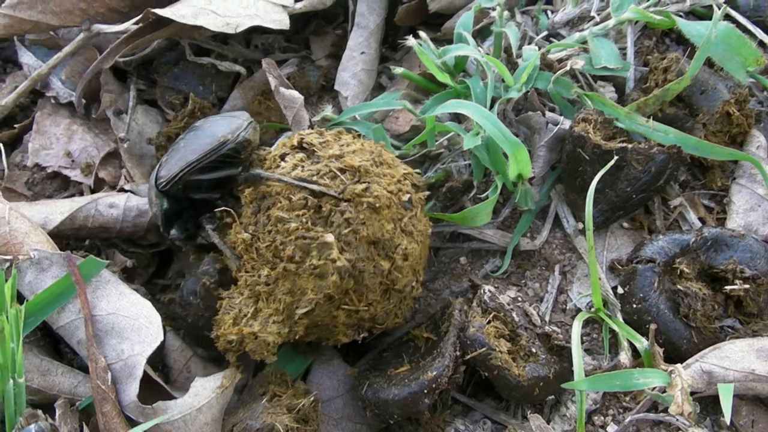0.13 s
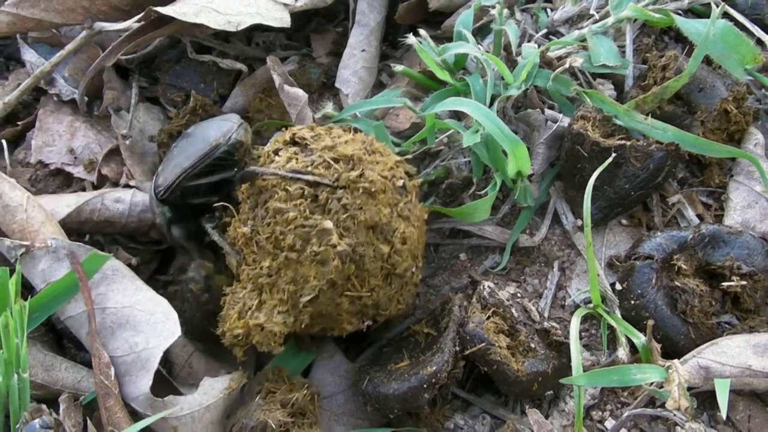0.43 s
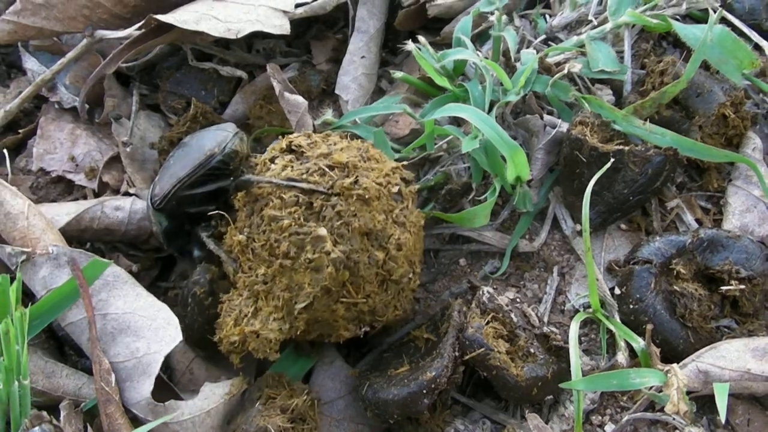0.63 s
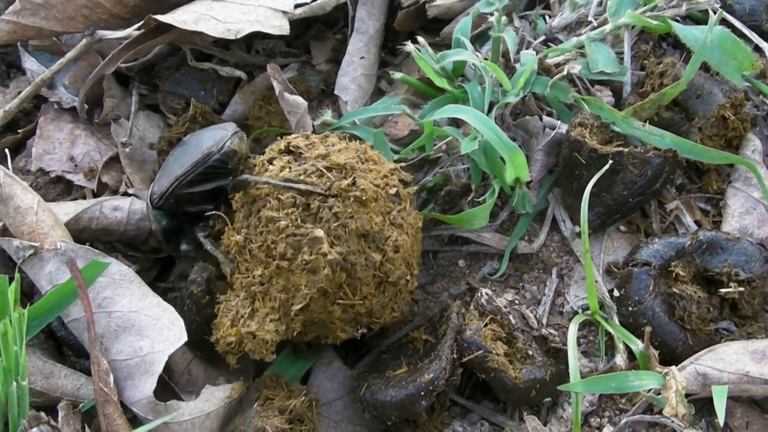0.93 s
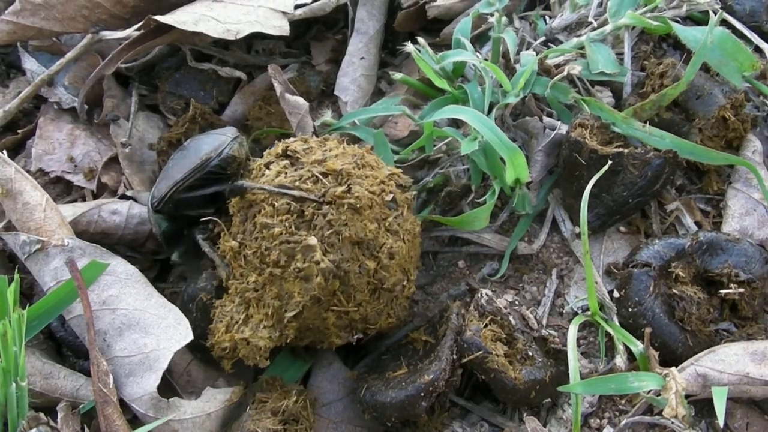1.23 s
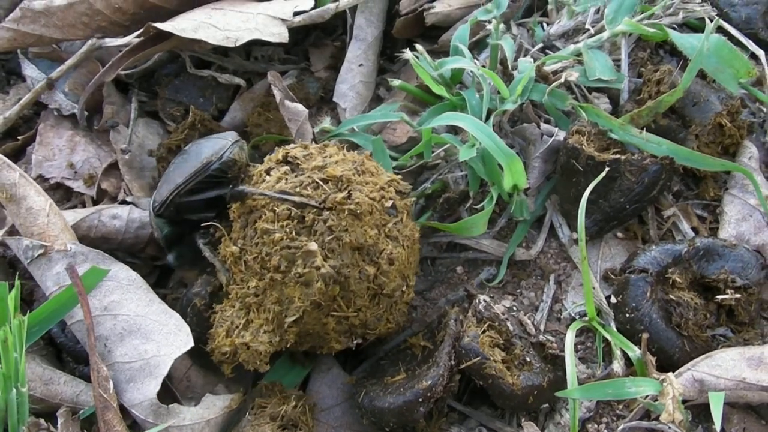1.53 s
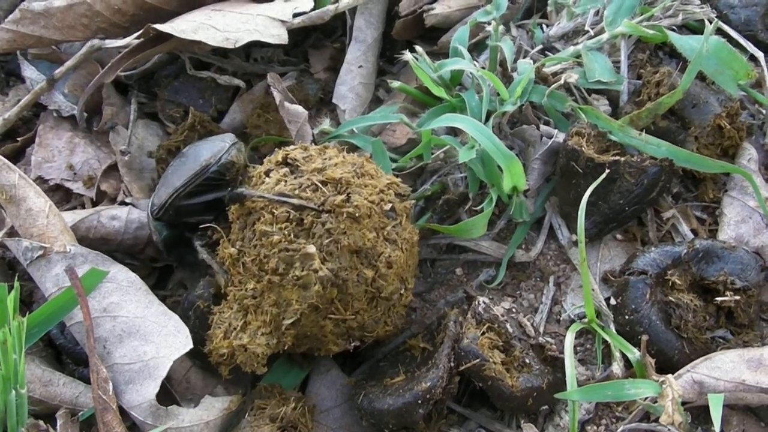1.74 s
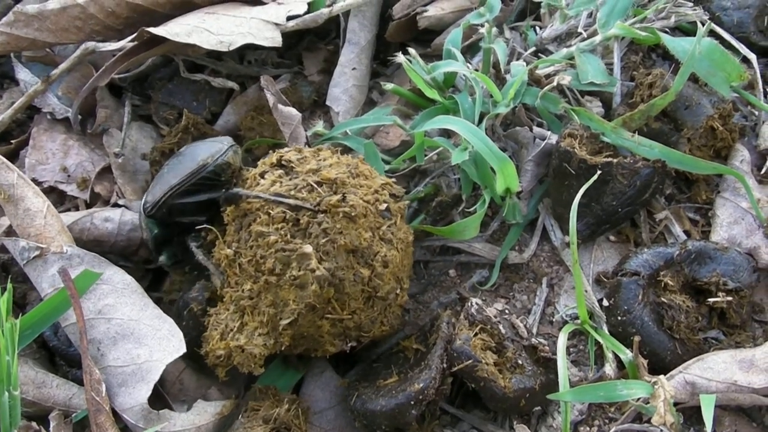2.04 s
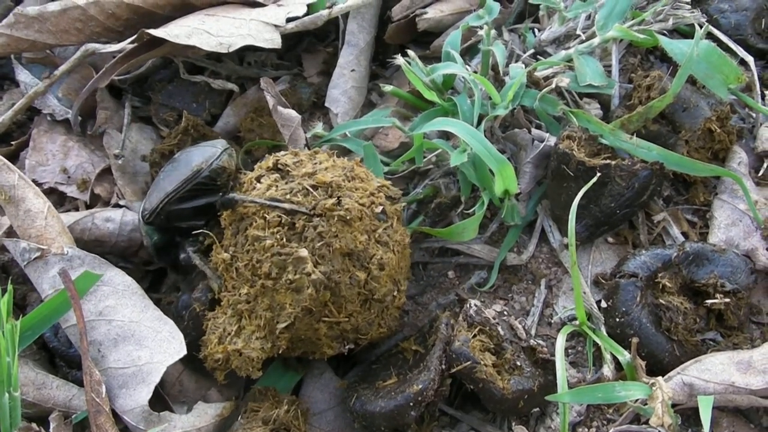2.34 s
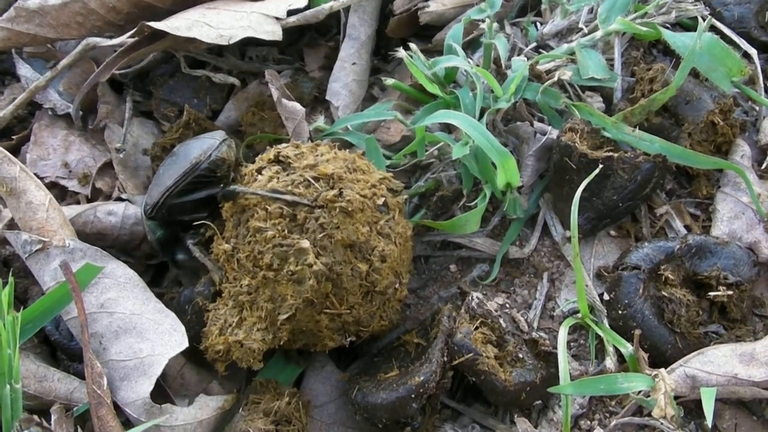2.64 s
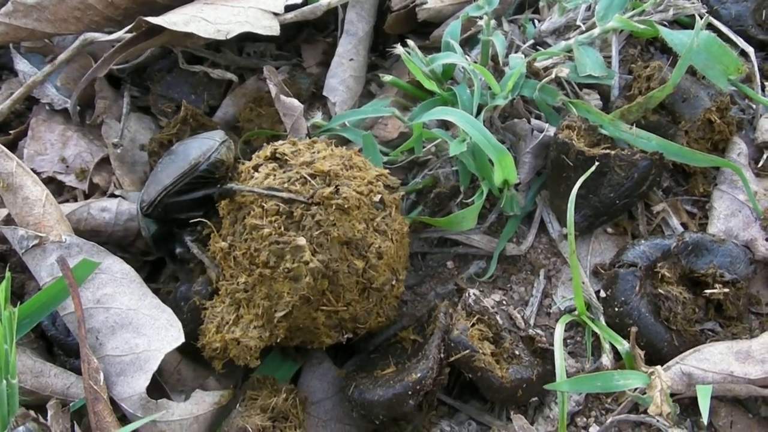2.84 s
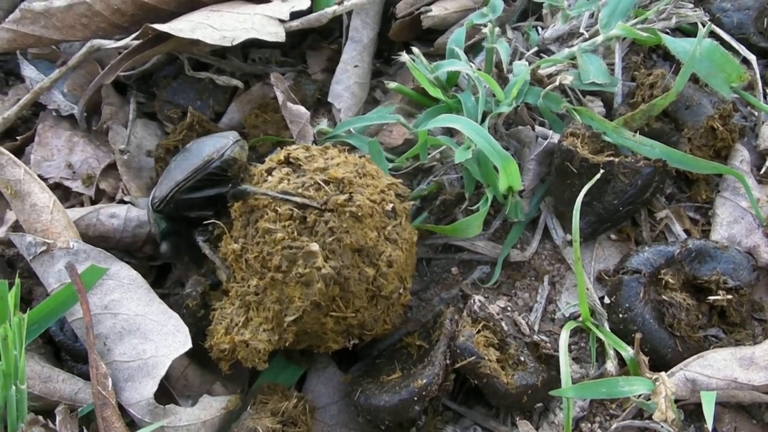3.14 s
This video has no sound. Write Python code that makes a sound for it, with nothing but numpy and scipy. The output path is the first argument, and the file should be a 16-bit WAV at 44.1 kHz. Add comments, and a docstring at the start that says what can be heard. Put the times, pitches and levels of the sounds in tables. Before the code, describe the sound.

Dry leaves snap and crackle irregularly under a dung beetle, over a faint rhythmic rasping hiss.

```python
"""Open ground with dry leaves: a dung beetle heaves at its ball close by, and leaves snap and crackle
under its legs, as runs of random clicks that ring short resonances. A high rasping hiss, shaped noise, swells
about three times a second. Something far off knocks eight times, like a hammer on wood: decaying
sines with echoes and a low boom. Filtered noise makes a lumpy rumble, a faint outdoor hiss and puffs of air."""
import sys
import numpy as np
from scipy import signal
from scipy.fft import rfft, irfft
from scipy.io import wavfile

SR = 44100
rng = np.random.default_rng(int(sys.argv[2]) if len(sys.argv) > 2 else 0)


def output_pcm(signal):
    """Save a mono or channel-first signal as 16-bit PCM at the path in sys.argv[1].

    Samples are clipped to [-1, 1] before scaling.
    """
    pcm = np.clip(np.atleast_2d(signal).T, -1, 1) * 32767
    wavfile.write(sys.argv[1], SR, np.round(pcm).astype(np.int16))


N = 144648
TIME = np.arange(N) / SR   # [s]

# leaf snaps: (time [s], relative level [dB], length [s], fragment pitch [Hz], crispness [dB])
LEAF_SNAPS = [(0.173, -42, 0.0019, 5700, -1), (0.327, -48, .003, 4400, -7), (0.381, -39.5, 0.0047, 6000, 0),
              (0.3867, -34, 0.0012, 5900, -9), (.3957, -31, 0.002, 6000, 3.5),
              (0.4005, -31, 0.00065, 6100, -9), (0.419, -38.5, 0.0036, 6200, -10),
              (0.4564, -41, 0.0028, 6400, -2), (0.509, -38, .0015, 5450, -7),
              (0.6384, -43.5, 0.0019, 1680, -4), (0.723, -36.5, 0.0009, 6650, -2),
              (0.732, -40.5, 0.0023, 5700, -8), (0.7537, -32.5, 0.0049, 4540, -1.5),
              (0.8404, -22, 0.0056, 6380, 2.5), (0.865, -29, 0.0009, 6540, 0),
              (0.936, -46, 0.0015, 4270, -2), (1.0252, -32, 0.0013, 6200, -0.5),
              (1.032, -40, .001, 5400, 1), (1.0515, -37.5, 0.00062, 4960, 1),
              (1.1524, -35, 0.00062, 9300, -3), (1.1541, -30.5, 0.0011, 4350, -2),
              (1.18, -40, 0.00094, 6060, -6), (1.3228, -23, .0011, 5860, -11),
              (1.3237, -22, 0.00096, 4100, -1.5), (1.5261, -32, .002, 2070, 5.5),
              (1.5286, -27.5, 0.00098, 4600, -9), (1.6486, -41.5, 0.0027, 6200, 5),
              (1.831, -40.5, 0.0021, 5000, -6.5), (1.88, -37, 0.0008, 5560, -5),
              (1.955, -37.5, .0015, 2970, -1), (1.992, -39, .004, 2280, -11),
              (2.0574, -36.5, 0.0011, 6460, -4), (2.064, -35, 0.0021, 6200, 1),
              (2.0713, -35.5, .0011, 4300, -1), (2.1083, -32.5, 0.00085, 6200, 4),
              (2.1467, -33, 0.0011, 6240, 1.5), (2.2447, -33, 0.0021, 4500, -4),
              (2.2498, -33.5, 0.0021, 4550, -2), (2.469, -34.5, 0.0033, 6100, 4),
              (2.493, -40, 0.0012, 3470, 6), (2.6845, -29, 0.0017, 6250, -11),
              (2.695, -36.5, 0.0034, 4200, -1), (3.061, -36.5, .0015, 5500, -3.5),
              (3.083, -37, 0.0034, 2480, -12), (3.1614, -36.5, 0.0012, 6300, -5),
              (3.1723, -32, 0.0012, 4000, 7.5)]
# resonances of the leaf litter: (frequency [Hz], width [Hz], relative level [dB])
LITTER_MODES = [(1920, 1000, -10), (2930, 750, -7.5), (4200, 500, 1), (5890, 960, -1), (6533, 1300, -2),
                (9380, 1040, -4), (13100, 1500, -13.5)]


def from_db(db):
    """Decibels to amplitude gain."""
    return 10 ** (np.asarray(db) / 20)


def rms_one(x):
    """Scale to rms 1."""
    return x / np.sqrt(np.mean(x ** 2) + 1e-20)


def butter(x, hz, kind):
    """Butterworth filter of design order 2."""
    return signal.sosfilt(signal.butter(2, hz, kind, fs=SR, output="sos"), x)


def drift(corner_hz):
    """Random wander of about unit spread: noise through two equal low-pass poles."""
    step, settle = 40, 2000   # samples per point, points dropped
    pole = np.exp(-2 * np.pi * corner_hz * step / SR)
    noise = rng.standard_normal(N // step + settle + 2)
    slow = signal.lfilter([1], [1, -2 * pole, pole ** 2], noise)[settle:]
    return np.interp(np.arange(N) / step, np.arange(len(slow)), rms_one(slow))


def spectrum_gain(spectrum):
    """Gain of each FFT bin, interpolated in dB over log frequency."""
    hz, db = np.transpose(spectrum)
    log_hz = np.log(np.fft.rfftfreq(N, 1 / SR) + 1)
    return from_db(np.interp(log_hz, np.log(hz), db))


def stereo_noise(spectrum, side_spectrum):
    """Coloured noise whose stereo width changes with frequency; rms 1."""
    colour, width = spectrum_gain(spectrum), spectrum_gain(side_spectrum)
    white = rfft(rng.standard_normal((2, N)))
    mid, side = irfft(white * [colour, colour * width], N)
    return rms_one(np.array([mid + side, mid - side]))


def resonate(x, hz, width_hz):
    """Two-pole resonance with gain 1 at its peak."""
    r = np.exp(-np.pi * width_hz / SR)
    zeros = np.array([1, 0, -1]) * (1 - r * r) / 2
    poles = [1, -2 * r * np.cos(2 * np.pi * hz / SR), r * r]
    return signal.lfilter(zeros, poles, x + 1e-18)


def resonate_twice(x, hz, width_hz):
    """Two equal resonances in series, for steeper skirts."""
    return resonate(resonate(x, hz, width_hz), hz, width_hz)


def ring(clicks, hz, t60_s):
    """A unit click starts a decaying sine of initial height 1."""
    r = from_db(-60 / (t60_s * SR))
    w = 2 * np.pi * hz / SR
    return signal.lfilter([0, np.sin(w)], [1, -2 * r * np.cos(w), r * r], clicks + 1e-18)


def add(track, time_s, sound):
    """Mix a sound into a track at a time."""
    i = int(time_s * SR)
    track[i:i + len(sound)] += sound[:len(track) - i]


def scatter(x, t60_s, size=3000):
    """Dense reflections: convolution with decaying noise of energy 1."""
    tail = rng.standard_normal(size) * from_db(-60 * TIME[:size] / t60_s)
    return signal.fftconvolve(x, tail / np.linalg.norm(tail))[:N]


def beetle():
    """Snaps and crackles under the beetle's legs, straight ahead, scattered by the litter."""
    snap_gain_db, scatter_db, side_db = 20.5, -10, -17
    direct = crackles()
    for time_s, db, length_s, fragment_hz, crisp_db in LEAF_SNAPS:
        add(direct, time_s, from_db(db + snap_gain_db) * snap(length_s, fragment_hz, crisp_db))
    mid = direct + from_db(scatter_db) * scatter(direct, t60_s=0.032)
    side = from_db(side_db) * scatter(direct, t60_s=0.012)
    return np.array([mid + side, mid - side])


def snap(length_s, fragment_hz, crisp_db):
    """A run of tiny fractures builds and dies, ringing the litter and the breaking fragment; energy 1."""
    size = 600   # samples
    fractures_per_s, fracture_spread_db = 8300, 3
    rise, fall = 1.07, 1.2   # envelope steepness
    crisp_above_hz = 8000
    fragment_width_hz, fragment_db = 840, 0
    low_edge_hz, deepening = 2650, 0.72   # edge for a 1 ms snap; longer snaps reach deeper

    progress = TIME[:size] / length_s
    breaks = rng.random(size) < fractures_per_s / SR
    breaks[int(length_s * SR / 2)] = True   # at least one fracture
    strengths = from_db(fracture_spread_db * rng.standard_normal(size))
    clicks = breaks * rng.choice([-1, 1], size) * strengths
    clicks = clicks * progress ** rise * np.exp(-fall * progress ** 2)

    modes = [(hz, width_hz, db + crisp_db * (hz > crisp_above_hz)) for hz, width_hz, db in LITTER_MODES]
    sound = leaf(clicks, modes + [(fragment_hz, fragment_width_hz, fragment_db)])
    length_ms = length_s * 1000
    sound = butter(sound, min(low_edge_hz / length_ms ** deepening, fragment_hz / 2), "high")
    return sound / np.linalg.norm(sound)


def leaf(clicks, modes):
    """Clicks ring short modes with deep valleys between them, each mode set to its own rms level."""
    return sum(from_db(db) * rms_one(resonate_twice(clicks, hz, width_hz)) for hz, width_hz, db in modes)


def crackles():
    """Faint random clicks ring thin leaves and thicker, duller litter, bunched around the snaps."""
    bunch_s, peak_per_s = 0.018, 900
    level_db, spread_db = -56.5, 5
    thick_mode = (2190, 2270, 0.5)   # (frequency [Hz], width [Hz], relative level [dB])

    strain = sum(np.exp(-np.abs(TIME - time_s) / bunch_s) for time_s, *_ in LEAF_SNAPS)
    strengths = from_db(spread_db * np.minimum(rng.exponential(1, (2, N)), 4))
    signs = rng.choice([-1, 1], (2, N))
    happens = rng.random((2, N)) < peak_per_s * np.minimum(strain, 1) / SR
    thin, thick = strengths * signs * happens
    return from_db(level_db) * rms_one(leaf(thin, LITTER_MODES) + leaf(thick, [thick_mode]))


def rasp():
    """A high rasping hiss: coloured noise, roughened by fast and slower level wander, swells and ebbs."""
    # swells: (middle [s], level [dB], length [s])
    swells = [(0.209, -51, 0.089), (0.489, -49, 0.1), (0.805, -49.5, 0.15), (1.10, -48, 0.12),
              (1.435, -47, 0.088), (1.731, -45, 0.091), (2.01, -50.5, 0.18), (2.358, -43.5, 0.13),
              (2.601, -46.5, 0.12), (2.926, -47, 0.093), (3.27, -46.5, 0.21)]
    # rasp spectrum: (frequency [Hz], density [dB])
    rasp_spectrum = [(1000, -13.5), (2200, -6), (3400, -5), (4100, 2.5), (6200, 3), (7300, 0.5), (9500, -5),
                     (10500, -10), (16000, -26)]
    # rasp stereo width: (frequency [Hz], side relative to mid [dB])
    rasp_width = [(2000, -8), (4900, -22), (7300, -8.5), (15000, -5)]
    swell_power = 4   # flat top, steep edges
    fast_db, fast_hz = 2.5, 280
    slow_db, slow_hz = 0.73, 34

    envelope = sum(from_db(db) * np.exp(-np.abs(2 * (TIME - middle_s) / length_s) ** swell_power / 2)
                   for middle_s, db, length_s in swells)
    roughness_db = fast_db * np.minimum(drift(fast_hz), 2) + slow_db * drift(slow_hz)
    return envelope * rms_one(stereo_noise(rasp_spectrum, rasp_width) * from_db(roughness_db))


def knocks():
    """Hollow blows ring damped modes, dulled by distance, with a few echoes and a low boom."""
    # blows: (time [s], relative level [dB])
    blows = [(1.4927, -38), (1.6712, -35), (1.852, -35), (2.046, -37.5), (2.254, -41), (2.467, -37),
             (2.673, -36), (2.8888, -36.5)]
    # modes of the struck body: (frequency [Hz], relative level [dB], T60 [s])
    body_modes = [(478, -9, 0.1), (638, 5, 0.02), (744, -4.5, 0.07)]
    # echoes: (delay [s], level relative to the blow [dB])
    echoes = [(.0064, -5.5), (.013, -13), (.021, -12)]
    gain_db, band_hz = -6, [352, 1270]
    boom_db, boom_hz, boom_width_hz, boom_t60_s = 32, 180, 110, 0.38

    clicks = np.zeros(N)
    for time_s, db in blows:
        for delay_s, echo_db in [(0.00021, 0)] + list(echoes):   # direct sound first
            add(clicks, time_s + delay_s, from_db([db + echo_db + gain_db]))
    # mode levels wander slightly from blow to blow
    body = sum(from_db(db) * ring(clicks * from_db(drift(17)), hz, t60_s) for hz, db, t60_s in body_modes)
    boom = resonate_twice(scatter(clicks, boom_t60_s, size=9000), boom_hz, boom_width_hz)
    return butter(body, band_hz, "band") + from_db(boom_db) * boom


def rumble():
    """Low coloured noise that comes and goes in lumps, with a random waver in level."""
    # rumble contour: (time [s], relative level [dB])
    contour = [(0.19, -61), (0.41, -65.5), (0.57, -56.5), (0.77, -64), (0.83, -57.5), (1.0, -57),
               (1.32, -61), (1.64, -57.5), (1.80, -72), (1.89, -52), (1.98, -72), (2.24, -55.5),
               (2.39, -71), (2.45, -52), (2.61, -72), (2.68, -58), (3.05, -59), (3.21, -64), (3.26, -58)]
    # rumble spectrum: (frequency [Hz], density [dB])
    low_spectrum = [(20, -17), (60, 0), (140, 2), (300, -6), (500, -6), (1200, -33)]
    # rumble stereo width: (frequency [Hz], side relative to mid [dB])
    low_width = [(30, 0.5), (150, -7)]
    gain_db, waver_db, waver_hz = 1.5, 2.9, 34
    level_db = np.interp(TIME, *np.transpose(contour)) + gain_db + waver_db * drift(waver_hz)
    return from_db(level_db) * stereo_noise(low_spectrum, low_width)


def air():
    """Even outdoor hiss from coloured noise, a little softer at first."""
    # hiss contour: (time [s], level [dB])
    contour = [(.15, -51.5), (1.5, -48.5), (3.2, -49)]
    # hiss spectrum: (frequency [Hz], density [dB])
    hiss_spectrum = [(50, -13.5), (500, -3.5), (3900, -6.5), (4800, -7.5), (9000, -11), (11500, -16.5),
                     (16000, -19)]
    # hiss stereo width: (frequency [Hz], side relative to mid [dB])
    hiss_width = [(3800, -1.5), (4800, -8), (13000, 2.5)]
    level_db = np.interp(TIME, *np.transpose(contour))
    return from_db(level_db) * stereo_noise(hiss_spectrum, hiss_width)


def puffs():
    """Air puffs on the microphone: Gaussian swells of deep noise, independent in each channel."""
    # puffs: (middle [s], level [dB])
    puff_events = [(.19, -56), (2.73, -54), (3.26, -58)]
    puff_s, below_hz = 0.048, 72
    push = sum(from_db(db) * np.exp(-((TIME - middle_s) / puff_s) ** 2) for middle_s, db in puff_events)
    return push * rms_one(butter(rng.standard_normal((2, N)), below_hz, "low"))


def scene():
    """The beetle in front, everything else behind."""
    return beetle() + rasp() + knocks() + rumble() + air() + puffs()


def record(dry):
    """Fades in from silence, notches one narrow band and cuts the top steeply."""
    start_s, fade_s = 0.12, 0.021
    notch_hz, notch_q = 7840, 13.9
    cutoff_hz = 15900
    x = dry * np.clip((TIME - start_s) / fade_s, 0, 1)
    x = signal.lfilter(*signal.iirnotch(notch_hz, notch_q, fs=SR), x)
    low_pass = signal.ellip(12, 0.1, 70, cutoff_hz, fs=SR, output="sos")   # ripple, stopband [dB]
    return signal.sosfilt(low_pass, x)


dry = scene()
out = record(dry)
output_pcm(out)
```